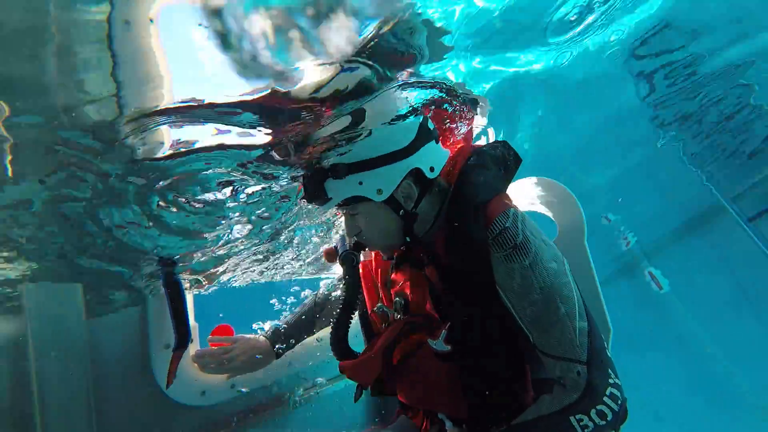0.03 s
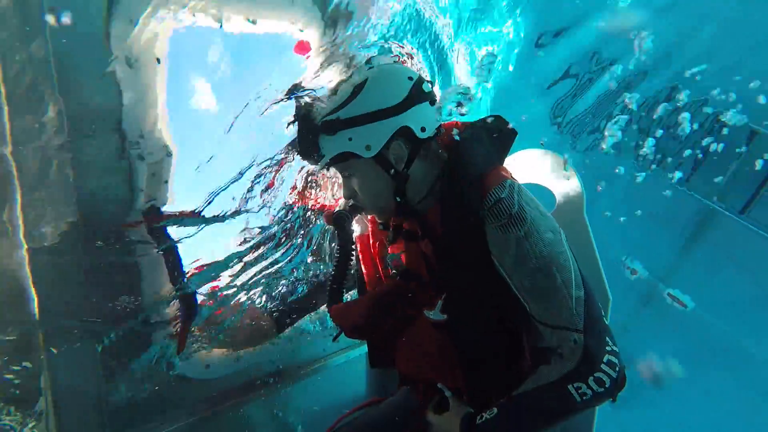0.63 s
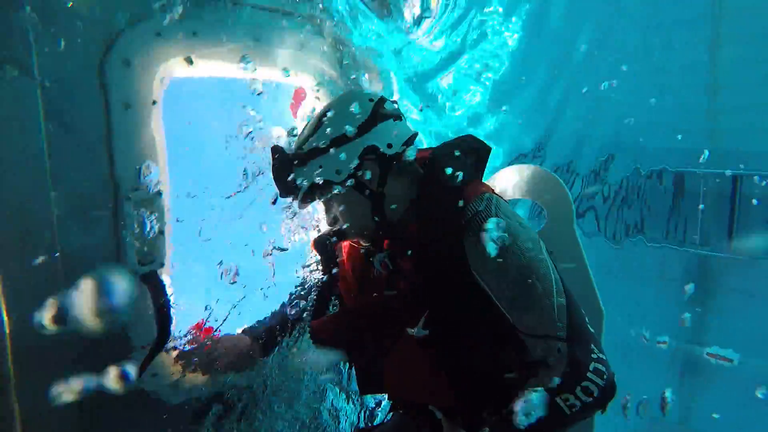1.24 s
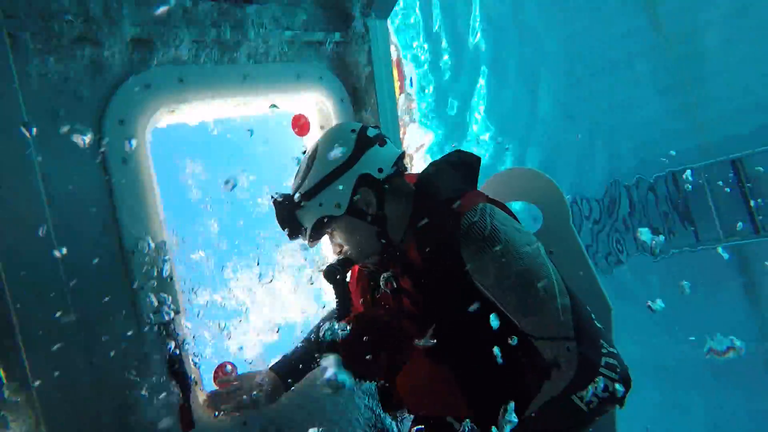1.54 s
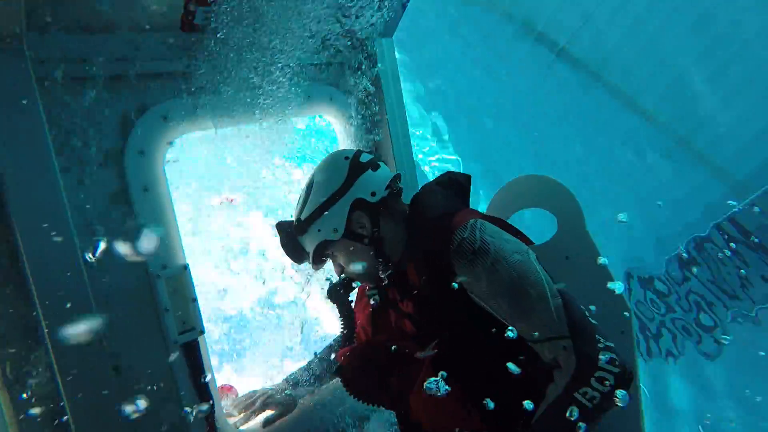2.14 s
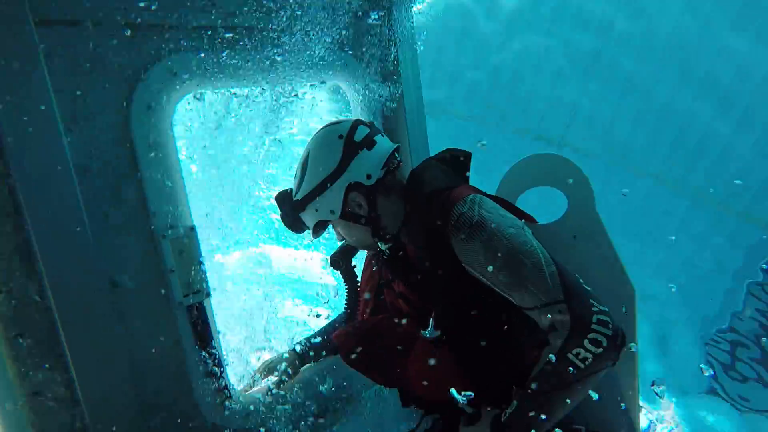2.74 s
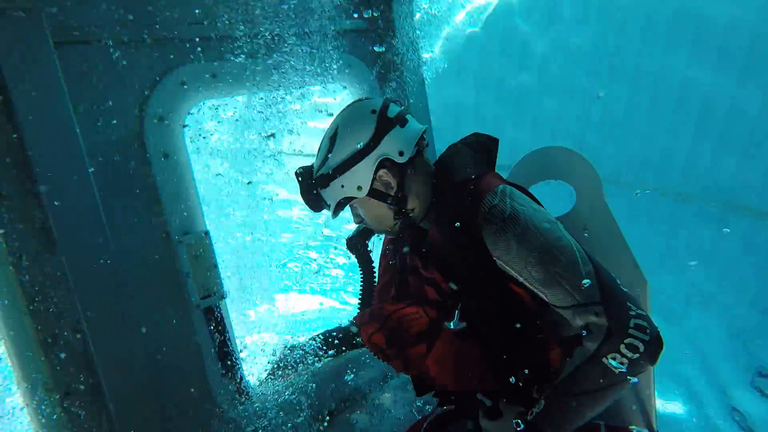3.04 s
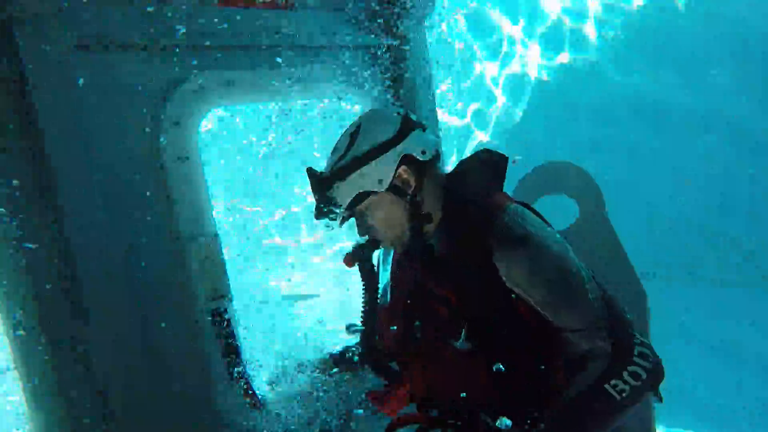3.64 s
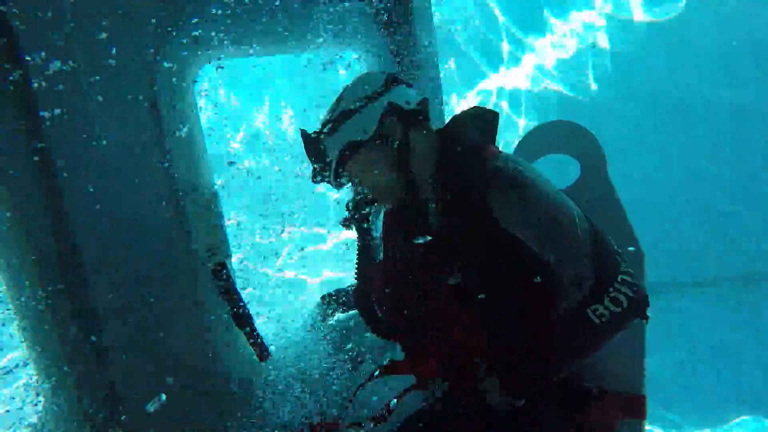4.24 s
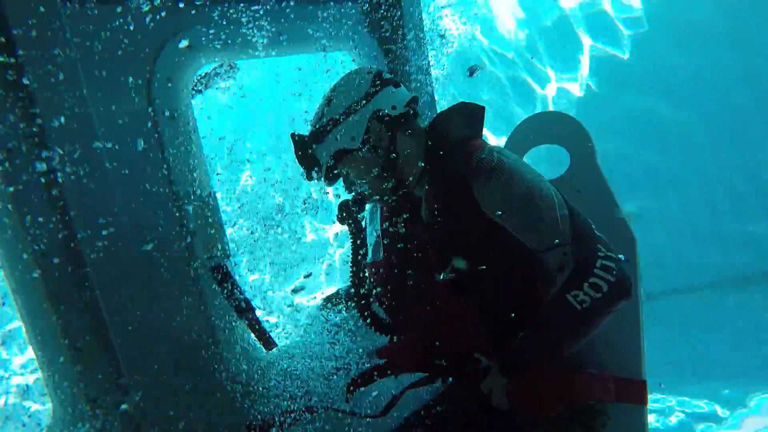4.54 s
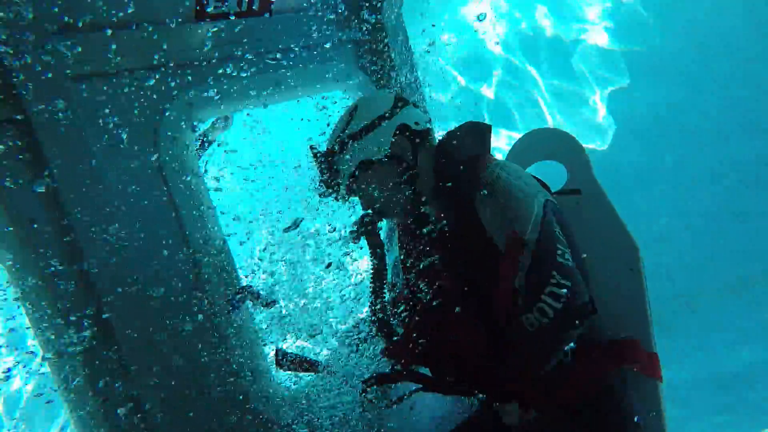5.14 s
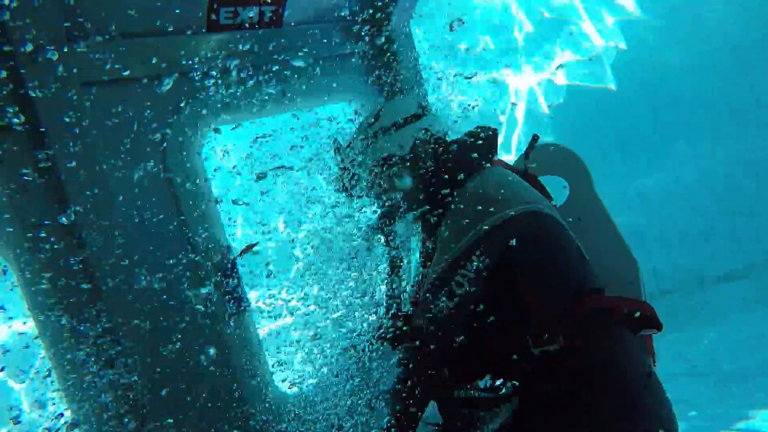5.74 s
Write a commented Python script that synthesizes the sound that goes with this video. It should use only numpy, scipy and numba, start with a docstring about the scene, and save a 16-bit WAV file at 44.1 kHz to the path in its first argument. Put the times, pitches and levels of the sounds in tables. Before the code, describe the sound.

Dense, muffled underwater bubbling starts immediately over a deep, surging rumble, heard from a sealed microphone case inside a flooding cabin. A fat, round glug sounds at about 0.15 seconds, and close bubbles gulp in quick succession, with a few faint snaps and dull knocks from fittings. Trapped air throbs low from about 0.6 seconds, and another gush comes at 1.2. From 1.5 seconds the bubbling eases into a softer churn while the rumble continues. Short, hissy spurts of fine air strike the case between 2 and 3 seconds, strongest just after 2.5. Bubbles gush again around 2.8 and 4.2 seconds, with deep pulses of air between 3 and 5 seconds. A thin, high fizz grows slightly, with a tiny sharp tick near 4.5. Brief gurgles at about 5.2 and 5.5 seconds rise from the low churning, which lasts until the end, near 5.8 seconds.

```python
"""Cabin flooding under water

A trainer cabin floods and rolls over in a pool, heard from inside a sealed, submerged housing.
Swarms of bubbles ring, trapped air pockets throb and water surges, all muffled above 1 kHz.
Single bubbles gulp close by, fittings knock, and fine air fizzes and spurts against the housing."""
import sys
import numpy as np
from scipy import signal
from scipy.fft import rfft, irfft
from scipy.io import wavfile
from scipy.ndimage import uniform_filter1d, minimum_filter1d
from numba import njit

SR = 44100
rng = np.random.default_rng(int(sys.argv[2]) if len(sys.argv) > 2 else 0)


def master(y):
    """Save y as 16-bit WAV."""
    cut = np.clip(np.atleast_2d(y).T, -1, 1)
    pcm = np.round(cut * 32767)  # scale
    wavfile.write(sys.argv[1], SR, pcm.astype(np.int16))


N = 254898
T = np.arange(N) / SR


# bed of bubbling, loud while the cabin fills, easing once it is under: time_s, large_db, small_db
BUBBLE_BED = [(0, -19.5, -27), (.055, -20.5, -34), (.22, -15.5, -35), (.29, -16, -29.5), (.34, -16.5, -31),
              (.46, -19.5, -24), (.56, -17.5, -31), (.75, -17, -28.5), (.9, -19.5, -27),
              (1.03, -16.5, -23.5), (1.2, -17, -28), (1.26, -18.5, -29), (1.33, -17.5, -30),
              (1.52, -24, -34.5), (1.95, -22.5, -34.5), (2.75, -18, -39), (3.05, -20.5, -36.5),
              (3.32, -23.5, -36), (3.7, -21.5, -36), (4.05, -28.5, -35), (4.44, -26, -41),
              (4.55, -26.5, -34), (4.68, -25.5, -37.5), (5.1, -26, -37.5), (5.4, -27, -35),
              (5.78, -27.5, -37.5)]
# gushes of escaping air: start_s, length_s, large_db, attack_s, small_offset_db
GUSHES = [(.062, 0.07, -16, .012, -9), (1.19, .12, -17, .04, -12), (2.82, 0.38, -23.5, 0.04, -8.5),
          (4.163, 0.19, -21, 0.0092, -9.5), (5.152, 0.015, -19, 0.01, -18),
          (5.54, 0.045, -23.5, 0.012, -7.5)]

def airflow():
    """Levels in dB of the large and small bubbles: escaping air gushes over a wavering bed."""
    large_gush = small_gush = 0
    for s, length, db, attack, small_offset_db in GUSHES:
        gush = burst_gain(s, length, db, attack, release_s=.04)
        large_gush += gush
        small_gush += gush * undb(small_offset_db)
    return [20 * np.log10(np.hypot(undb(bed_db), gush)) + 1.1 * waver()
            for bed_db, gush in zip(curves(BUBBLE_BED), (large_gush, small_gush))]


# froth of the smallest ringing bubbles: time_s, level_db
FROTH = [(0, -59), (.1, -48), (.19, -62), (.45, -61.5), (.8, -55), (1, -57), (1.25, -51.5), (1.37, -61.5),
         (1.6, -63.5), (2.3, -57), (2.85, -55), (3.3, -60.5), (3.9, -60), (4.23, -58), (4.42, -61.5),
         (4.6, -57.5), (4.75, -60.5), (5.2, -59), (5.78, -60)]
# ranges of large bubbles, small bubbles and froth: low_hz, high_hz
BUBBLE_BANDS = [(170, 470), (470, 1000), (1000, 2700)]
# tone of the bubbling at the surface, while filling, sunk and in the hollow lulls: freq_hz, gain_db
SURFACE_EQ = [(150, 6.5), (180, -13.5), (203, 2.5), (235, -9), (320, -2.5), (400, -10), (460, -15),
              (560, -17.5), (660, -26), (790, -26.5), (950, -43.5), (1280, -38.5), (1450, -48),
              (1700, -52.5), (2600, -63.5)]
FILLING_EQ = [(150, -9), (205, 8.5), (255, 0.5), (330, 2), (400, 1), (470, -4), (550, -4), (640, -19),
              (750, -18.5), (900, -35.5), (1100, -36), (1280, -41), (1700, -55), (2600, -67)]
SUNK_EQ = [(150, 2.5), (200, 2.5), (260, 0), (335, -1), (410, -3), (480, -3.5), (600, -3.5), (700, -11.5),
           (790, -9.5), (900, -20.5), (1080, -42.5), (1300, -45), (1700, -50), (2600, -62.5)]
LULL_EQ = [(150, -3.5), (200, 3), (260, -1.5), (330, -1.5), (410, -5), (480, -16), (560, -11), (650, -11.5),
           (760, -12), (900, -20), (1080, -37), (1300, -40.5), (1650, -45), (2600, -62.5)]

def churn(large_db, small_db, near):
    """While the cabin fills, bubbles ring longer; once it is under, they crowd and damp each other."""
    surface = np.interp(T, [.28, .34], [1, 0])
    under = np.interp(T, [1.05, 1.5], [0, 1])
    lull = np.interp(T, [2.75, 2.87, 4.3, 4.42, 4.85, 5.05], [1, 0, 0, 1, 1, 0])
    filling = (swarm(165, 480, per_s=600, cycles=7, spread_db=.6, rise=.012),
               swarm(460, 1020, per_s=1000, cycles=6.5, spread_db=.54, rise=.011),
               swarm(960, 1900, per_s=450, cycles=12, spread_db=3.1, rise=.0091))
    sunk = (swarm(164.3, 458, per_s=750, cycles=2.764, spread_db=1.46, rise=.031),
            swarm(449, 1009, per_s=1100, cycles=3.587, spread_db=1, rise=.031),
            swarm(1000, 2500, per_s=2200, cycles=6, spread_db=1.3, rise=.011))
    levels = large_db, small_db, *curves(FROTH)
    out = 0
    for early, late, db, edges in zip(filling, sunk, levels, BUBBLE_BANDS):
        early = crossfade(unit(colour(early, FILLING_EQ)), unit(colour(early, SURFACE_EQ)), surface)
        late = crossfade(unit(colour(late, SUNK_EQ)), unit(colour(late, LULL_EQ)), lull)
        out += ride_level(crossfade(early, late, under), db, band(near, *edges), span_s=.06)
    return out


def swarm(lo_hz, hi_hz, per_s, cycles, spread_db, rise):
    """Random bubbles of one range of sizes: big ones ring lower and longer."""
    draws = np.random.default_rng(rng.integers(2 ** 31)).random((int(per_s * N / SR), 5))
    when, smallness, loudness, sustain, phase = draws.T
    hz = lo_hz * (hi_hz / lo_hz) ** smallness
    peak = undb(-spread_db * np.log(1 - loudness))  # a few stand out of the crowd
    peak *= (hz / lo_hz) ** 1.5  # equal power per Hz
    swell_s = cycles * (.5 + sustain) / hz
    ringing = bubbles(when * N / SR, hz, peak, swell_s, rise * 2 * phase, phase)
    return band(ringing, lo_hz, hi_hz)


@njit
def bubbles(peak_s, hz, peak, swell_s, rise, phase):
    """Each bubble swells as it pinches off, peaks and rings down, gliding up in pitch."""
    out = np.zeros(N)
    for k in range(len(peak_s)):
        swell, step = swell_s[k] * SR, 2 * np.pi * hz[k] / SR
        first = int(peak_s[k] * SR - swell)
        ring = peak[k] * np.exp(2 + 2j * np.pi * phase[k])
        pole = np.exp(-2 / swell + 1j * step * (1 - rise[k]))
        glide = np.exp(1j * step * rise[k] / swell)
        for i in range(min(int(8 * swell), N - first)):
            ring *= pole
            pole *= glide
            if first + i >= 0:
                out[first + i] += (i / swell) ** 2 * ring.imag
    return out


# close-up bubbles: peak_s, pitch_hz, peak_db, swell_cycles
GULPS = [(.035, 200, -10, 3.6), (.05, 1170, -40, 7), (.09, 1300, -43, 9), (.1, 210, -5, 3.6),
         (.068, 520, -22, 3), (.105, 380, -13, 5), (.108, 554, -16, 6.5), (.134, 740, -25, 10),
         (.118, 1070, -39, 7), (.125, 1260, -34, 10), (.189, 202, -9.5, 4), (.228, 196, -11, 8),
         (.224, 1270, -53, 6), (.268, 202, -9, 3.7), (.325, 640, -22, 5), (.335, 440, -14, 7),
         (.34, 320, -8, 2.5), (.391, 320, -9, 1.8), (.393, 538, -15, 6), (.513, 167, -10.5, 2.3),
         (.585, 560, -22, 3), (.63, 1230, -46, 12), (.669, 213, -14, 9), (.697, 680, -18, 2),
         (.723, 510, -17, 3), (.8, 1170, -45, 12), (.815, 910, -35, 10), (.87, 1140, -46, 14),
         (1.061, 490, -16, 6), (1.09, 1910, -55, 22), (1.151, 405, -6, 2), (1.229, 900, -26, 8),
         (1.224, 500, -20, 3), (1.244, 340, -10, 4.5), (1.255, 770, -23, 7), (1.287, 52, -6, 1.7),
         (1.297, 330, -7.5, 7), (1.312, 740, -27, 10), (1.353, 1390, -44, 10), (1.355, 742, -18.5, 11),
         (1.429, 318, -16, 10), (1.44, 1380, -49.5, 12), (1.53, 114, -6.5, 4), (1.699, 784, -28, 10),
         (1.837, 761, -28, 10), (2.048, 678, -23, 1.8), (2.104, 315, -14, 4.3), (2.275, 690, -21, 1.8),
         (2.399, 585, -20, 2.5), (2.441, 587, -23, 2), (2.618, 318, -11.5, 2.7), (2.807, 342, -12.5, 3.4),
         (2.851, 587, -19, 2), (2.863, 337, -12.5, 3.4), (2.895, 1233, -46, 18), (2.872, 604, -24, 9),
         (2.903, 622, -22, 2), (3.008, 770, -25, 6), (3.015, 380, -11, 4), (3.071, 346, -9, 2.3),
         (3.146, 355, -13, 5), (3.198, 590, -24, 4), (3.41, 600, -25, 3.5), (3.535, 73, -9, 2.3),
         (3.654, 335, -12, 3), (3.772, 635, -24, 3.5), (3.743, 151, -14, 6.5), (3.78, 130, -10, 2.5),
         (3.949, 604, -24, 3.5), (3.894, 69, -6.5, 1.9), (4.17, 545, -17, 1.8), (4.182, 320, -14, 3),
         (4.195, 530, -14, 1.8), (4.207, 360, -14, 5), (4.26, 380, -18, 9), (4.265, 830, -25, 2),
         (4.285, 350, -17, 5), (4.463, 151, -12, 1.8), (4.39, 770, -27.5, 5), (4.596, 153, -7, 1.8),
         (4.604, 279, -13, 2), (4.764, 680, -24, 2), (5.035, 604, -22, 1.8), (5.062, 587, -23, 1.8),
         (5.042, 790, -29, 5), (5.166, 335, -7, 1.9), (5.34, 880, -26, 3), (5.413, 760, -18, 2.3),
         (5.49, 130, -12, 3), (5.557, 430, -8, 1.6)]

def gulps():
    """Single bubbles break off close by and glide up a little as they rise; long rings glide less."""
    peak_s, hz, db, cycles = np.array(GULPS, float).T.copy()
    rise = .05 / cycles
    return bubbles(peak_s, hz, undb(db), cycles / hz, rise, rng.random(len(hz)))


# partials of one fat glug: pitch_hz, gain_db, t60_s
GLUG_MODES = [(386, 1.5, 0.21), (480, -3, .03), (620, -4, 0.025), (775, -3, 0.095), (850, -8, 0.045)]

def glug():
    """A big air pocket breaks through the opening; its short rings die at once, leaving a round tone."""
    out, t = np.zeros(N), T[:SR // 3]
    ring = sum(damped_mode(t, hz, db, t60_s) for hz, db, t60_s in GLUG_MODES)
    ring *= 1 - np.exp(-(t / .006) ** 2)  # soft attack
    place(out, ring, start_s=.151, peak_db=-3.5)
    return signal.sosfilt(signal.butter(8, 1000, fs=SR, output="sos"), out)


# air pockets coming loose: start_s, length_s, level_db, pitch_hz
THROBS = [(0.64, 0.49, -16, 74), (1.24, 0.19, -15, 54), (2.97, .14, -19, 66), (3.494, 0.41, -19.5, 66),
          (4, 0.23, -19, 44), (4.314, 0.09, -19, 72), (4.8, 0.25, -22, 43)]

def throbs():
    """Large pockets break loose and pulse with a deep, unsteady tone that climbs as they shed air."""
    out, rise_per_s = 0, .35
    for s, length, db, hz in THROBS:
        pitch_hz = hz * (1 + rise_per_s * np.clip(T - s, 0, 1) + .05 * waver())
        tone = np.sqrt(2) * np.sin(2 * np.pi * np.cumsum(pitch_hz) / SR)
        wobble = undb(3.5 * np.tanh(waver()))
        out += tone * wobble * burst_gain(s, length, db, attack_s=.037, release_s=.1)
    return out


# the water's push, and the steady throb of trapped air: time_s, level_db
SURGE = [(0, -16.5), (.25, -32.5), (.8, -18), (1.3, -13.5), (1.65, -15.5), (2, -17.5), (2.75, -18.5),
         (2.9, -13.5), (4.2, -13), (4.6, -14.5), (5.78, -16.5)]
POCKETS = [(0, -14.5), (.6, -14.5), (1.35, -19), (1.7, -16.5), (2.2, -18), (3.05, -16), (3.4, -19),
           (4.15, -20), (4.55, -18.5), (4.75, -20), (5.05, -18), (5.38, -22.5), (5.6, -18.5), (5.78, -16.5)]
# bass-heavy tone of both: freq_hz, gain_db
HEAVE_EQ = [(7.1, -36), (12, 2.5), (64, 1), (126, -4), (166, -8.5), (220, -10), (290, -52), (480, -120)]

def heave(near):
    """Turbulent water pushes on the housing and large air pockets throb under the cabin roof."""
    surge = colour(band(rng.standard_normal(N), 9.6, 62, order=4), HEAVE_EQ)
    pockets = colour(swarm(60, 177.1, per_s=170, cycles=2.637, spread_db=-1.1, rise=.0049), HEAVE_EQ)
    return (ride_level(surge, *curves(SURGE), band(near, 18, 68), span_s=.05)
            + ride_level(pockets, *curves(POCKETS), band(near, 46, 180), span_s=.046))


# hits on the cabin's fittings: start_s, peak_db, pitch_hz
KNOCKS = [(.085, -46, 3850), (0.09, -44, 2000), (.273, -30.5, 1540), (.274, -53, 2600), (.274, -27, 1000),
          (.311, -21, 1000), (.314, -36, 1360), (.324, -29, 950), (.698, -45, 1620), (1.261, -50.5, 2806),
          (1.214, -21.5, 990), (1.434, -35.5, 1030), (1.512, -31, 1114), (1.513, -42, 1570),
          (1.515, -49.5, 2850), (2.097, -30.5, 1623), (2.272, -23.5, 985), (2.515, -41, 1680),
          (2.709, -38, 1370), (2.965, -45, 1740), (3.012, -35, 1020), (3.071, -35, 1020),
          (3.085, -48, 2940), (3.182, -44, 1850), (3.315, -34, 1580), (4.5, -43, 1880), (4.752, -39, 1780),
          (4.756, -49, 2100), (5.334, -30, 860), (5.337, -41.5, 2020)]
# partials of a fitting: pitch_ratio, gain_db, ring_share
FITTING_MODES = [(0.632, 5, 0.83), (0.881, 0.5, 0.91), (1, 5.5, 0.83), (1.171, -6, 0.3),
                 (1.651, -31.5, 0.3)]

def knocks():
    """Fittings knock; the water damps their ring at once, the small ones soonest."""
    out, t = np.zeros(N), T[:SR // 8]
    ring_cycles, contact_cycles = 75, .9
    for s, db, hz in KNOCKS:
        ring = sum(damped_mode(t, ratio * hz, mode_db, t60_s=share * ring_cycles / hz)
                   for ratio, mode_db, share in FITTING_MODES)
        contact = (1 - np.exp(-t * hz / contact_cycles)) ** 2
        place(out, ring * contact, s, db)
    return out


# fader ride for fine air drifting past: time_s, level_db
DRIFT = [(0, -69.5), (1.3, -65.5), (1.5, -71), (3, -63.5), (3.74, -68.5), (3.83, -63), (4, -66),
         (4.2, -61.5), (4.37, -62.5), (4.55, -64.5), (4.9, -65.5), (5.78, -63)]
# bright tone of the fizz: freq_hz, gain_db
FIZZ_EQ = [(1410, -33.5), (2400, -7), (3890, -10), (6120, -9), (7160, -9.5), (7620, -8), (8560, -2.5),
           (9630, -3), (10400, -1.5), (11700, -7.5), (13700, -9), (14600, -18), (15500, -28.5)]

def fizz():
    """Tiny bubbles tick on the housing, whose wall rings near 10 kHz; the finest add the top."""
    drift_db, = curves(DRIFT)
    finest = np.interp(T, [0, 3.9], [.15, .9])  # their share grows as the air is broken up
    grains = colour(crackle(per_s=7000, spread_db=1.8), FIZZ_EQ)
    crowd = colour(crackle(per_s=17000, spread_db=1.2), FIZZ_EQ)
    grains, crowd = (x / np.std(band(x, 8300, 10120)) for x in (grains, crowd))
    top = signal.sosfiltfilt(signal.butter(8, 11400, "high", fs=SR, output="sos"), grains)
    dull, far_hiss = signal.sosfiltfilt(signal.butter(6, 7300, fs=SR, output="sos"), [grains, crowd])
    sizzle = grains - dull - (1 - finest) * top
    pings = unit(swarm(7600, 11200, per_s=170, cycles=9, spread_db=2.8, rise=.01))
    pings = unit(np.tanh(pings / 10))  # round off the loudest
    close = undb(-1.4) * sizzle + undb(-6.5) * (1 - finest ** 2 / 2) * pings
    cloud_db = np.interp(T, [1.5, 3, 4.6, 5.2], [-2.5, -.47, .73, 1.4])  # the cabin clouds with air
    return close * undb(drift_db + .8 * waver()) + far_hiss * undb(.5 * drift_db - 34 + cloud_db)


# spurts of fine air: start_s, level_db
SPURTS = [(2.039, -49), (2.18, -47), (2.286, -53.5), (2.407, -53), (2.528, -37), (2.561, -43), (2.579, -46),
          (2.64, -38.5), (2.696, -49), (2.78, -41.5), (2.865, -55), (2.958, -52.5), (2.982, -52.5),
          (3.037, -52), (3.097, -56.5), (3.162, -63.5), (3.531, -59)]

def spurts():
    """Jets of fine air strike the housing all at once and sizzle out."""
    strength, t = np.zeros(N), T[:SR // 6]
    attack_s, body_s, tail_s = .004, .019, .033
    burst = np.exp(-(t / body_s) ** 4) + undb(-7.5) * np.exp(-t / tail_s)
    burst *= 1 - np.exp(-t / attack_s)
    for s, db in SPURTS:
        add(strength, s, undb(db) * burst)
    jets = crackle(per_s=5500, spread_db=1) * strength
    return housing(jets) / np.std(housing(rng.standard_normal(N)))


# pinpoint pops: start_s, peak_db, pitch_hz
TICKS = [(.083, -39.5, 8040), (.254, -55, 8140), (.321, -49, 10560), (0.44, -47, 8900), (.471, -44, 10100),
         (.477, -46.5, 8860), (.584, -45, 8700), (.747, -48, 10400), (1.021, -49, 10140),
         (1.084, -47, 9150), (1.337, -45.5, 9940), (1.392, -50, 10400), (4.479, -41, 9350),
         (4.538, -33, 10430), (4.626, -51, 10300)]

def ticks():
    """Lone tiny bubbles burst: each pings at its own pitch and rings the housing."""
    out, t = np.zeros(N), T[:SR // 40]
    attack_s, decay_s = .001, .0019
    envelope = np.exp(-t / decay_s) * (1 - np.exp(-t / attack_s))
    for s, db, hz in TICKS:
        ping = envelope * np.sin(2 * np.pi * hz * t)
        wall = housing(envelope * rng.standard_normal(len(t)))
        place(out, unit_peak(ping) + .796 * unit_peak(wall), s, db)
    return band(out, 5000, 12500, order=2)


# resonances of the housing: pitch_hz, width_hz, gain_db
HOUSING_MODES = [(1870, 510, -17), (3240, 150, -22), (4670, 380, -18.5), (6100, 380, -20), (7400, 930, -16),
                 (8600, 190, -5), (8470, 290, -3.5), (9000, 220, -6), (9650, 120, -2), (10460, 150, -1),
                 (10640, 230, -0.5), (11350, 270, -6.5), (12200, 250, -7.5), (12900, 700, -9.5),
                 (14500, 900, -16.5)]

def housing(x):
    """The wall of the housing rings with its own modes, alternating in polarity."""
    return sum((-1) ** k * undb(db) * signal.lfilter(*signal.iirpeak(hz, hz / width, fs=SR), x)
               for k, (hz, width, db) in enumerate(HOUSING_MODES))


# sharp snaps of the surface: start_s, peak_db
SNAPS = [(.076, -48.5), (0.441, -44.5), (.672, -55.5), (.705, -54), (.72, -53), (0.747, -47), (0.862, -54),
         (1.143, -50), (1.18, -57), (1.275, -52), (1.295, -53), (1.53, -50.5)]

def spatter():
    """The broken surface snaps on the housing until the cabin is under: a few sharp snaps, many faint."""
    faint = unit(band(crackle(per_s=120, spread_db=1.2), 2100, 3600, order=2))
    out = faint * undb(-79.5) * np.interp(T, [1.25, 1.4], [1, 0])
    t, decay_s = T[:SR // 100], .00056
    for s, db in SNAPS:
        click = rng.standard_normal(len(t)) * np.exp(-t / decay_s)
        place(out, band(click, 2000, 4200, order=1), s, db)
    return out


def damped_mode(t, hz, db, t60_s):
    """A sine of random phase that dies away by 60 dB in t60_s."""
    return undb(db) * np.exp(-np.log(1000) * t / t60_s) * np.sin(2 * np.pi * (hz * t + rng.random()))


def crackle(per_s, spread_db):
    """Tiny random clicks of uneven size."""
    clicks = (rng.random(N) < per_s / SR) * rng.standard_normal(N)
    return unit(clicks * undb(spread_db * np.minimum(rng.exponential(size=N), 4)))


def waver(per_s=14):
    """Smooth random wander around zero."""
    k = int(SR / per_s)
    steps = np.repeat(rng.standard_normal(N // k + 1), k)
    return 1.9 * smooth(steps, k)[:N]


def burst_gain(start_s, length_s, db, attack_s, release_s):
    """Envelope of one burst of air: it rises, holds and dies away."""
    attack = np.clip((T - start_s) / attack_s, 0, 1)
    return undb(db) * attack * np.exp(-np.maximum(T - start_s - length_s, 0) / release_s)


def ride_level(x, db, near, span_s):
    """Hold x on a level curve, ducking up to 3 dB: air in a near bubble is missing from the swarm."""
    power = undb(db) ** 2
    power = np.maximum(power - running_power(near, .008), .5 * power)
    return x * np.sqrt(power / running_power(x, span_s))


def running_power(x, span_s):
    """Mean square over a sliding window."""
    return smooth(x ** 2, int(span_s * SR)) + 1e-12


def smooth(x, samples):
    """Moving average, applied twice."""
    return uniform_filter1d(uniform_filter1d(x, samples), samples)


def colour(x, eq):
    """Causal EQ through (freq_hz, gain_db) points, built from the cepstrum."""
    size = 16384
    hz, db = np.transpose(eq)
    log_hz = np.log(np.fft.rfftfreq(size, 1 / SR) + 1)
    cepstrum = irfft(np.log(undb(np.interp(log_hz, np.log(hz), db))))
    cepstrum[1:size // 2] *= 2
    cepstrum[size // 2 + 1:] = 0
    return signal.fftconvolve(x, irfft(np.exp(rfft(cepstrum))))[:N]


def band(x, lo_hz, hi_hz, order=5):
    """Band-pass, steep by default."""
    return signal.sosfilt(signal.butter(order, [lo_hz, hi_hz], "band", fs=SR, output="sos"), x)


def curves(table):
    """One automation curve for each column after time_s."""
    s, *columns = np.transpose(table)
    return [np.interp(T, s, column) for column in columns]


def crossfade(a, b, mix):
    """Blend from a at mix 0 to b at mix 1."""
    return a * (1 - mix) + b * mix


def add(out, start_s, x):
    """Mix x into out from start_s."""
    i = int(start_s * SR)
    out[i:i + len(x)] += x[:N - i]


def place(out, hit, start_s, peak_db):
    """Mix in a hit at a set peak level."""
    add(out, start_s, undb(peak_db) * unit_peak(hit))


def undb(db):
    """Decibels to gain."""
    return 10 ** (np.asarray(db) / 20)


def unit(x):
    """Scale to rms 1."""
    return x / np.sqrt(np.mean(x ** 2))


def unit_peak(x):
    """Scale to peak 1."""
    return x / np.abs(x).max()


def scene():
    """Bubbling and low water in mono, with knocks and fine air on top."""
    near = gulps() + glug()
    large_db, small_db = airflow()
    water = near + throbs() + heave(near) + churn(large_db, small_db, near)
    return (water + knocks() + fizz() + spurts() + ticks() + spatter())[None]


def record(dry):
    """A smooth limiter holds the peaks under full scale; the top is cut."""
    ceiling, window, top_hz = .93, 512, 15600
    gain = np.minimum(1, ceiling / (np.abs(dry) + 1e-9))
    gain = smooth(minimum_filter1d(gain, 2 * window), window)
    return signal.sosfilt(signal.ellip(8, .2, 70, top_hz, fs=SR, output="sos"), dry * gain)


dry = scene()
out = record(dry)
master(out)
```